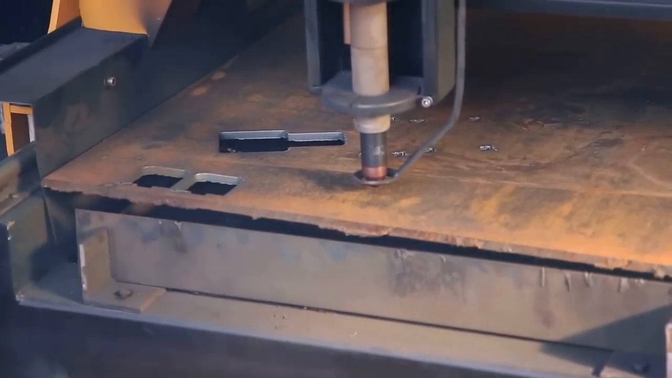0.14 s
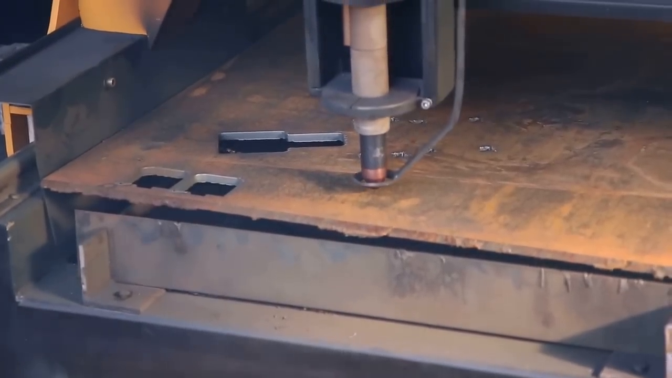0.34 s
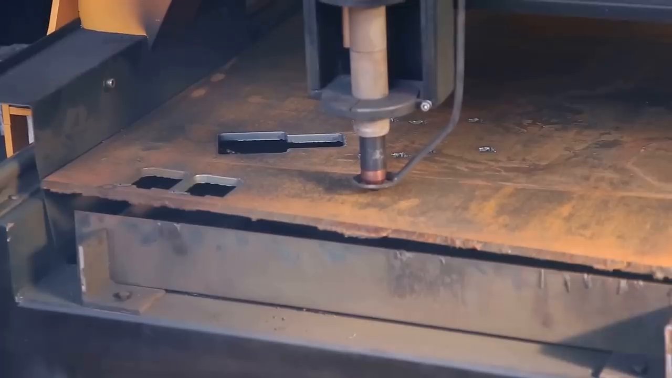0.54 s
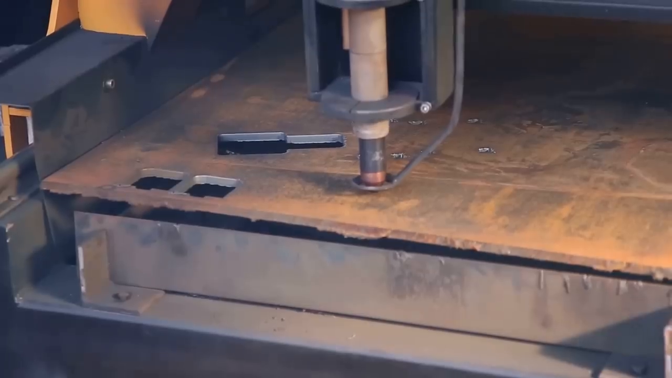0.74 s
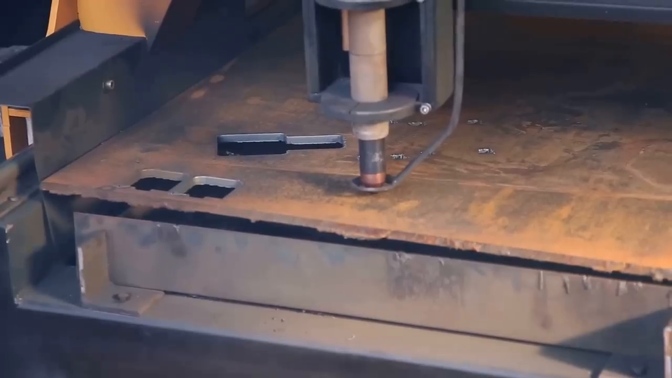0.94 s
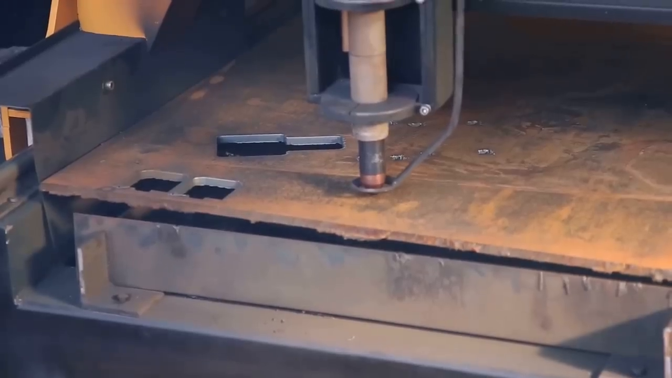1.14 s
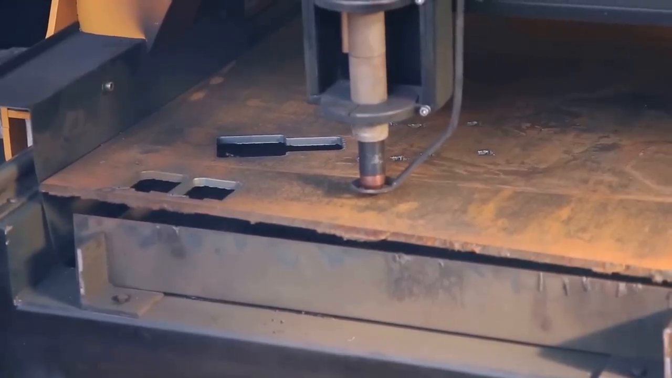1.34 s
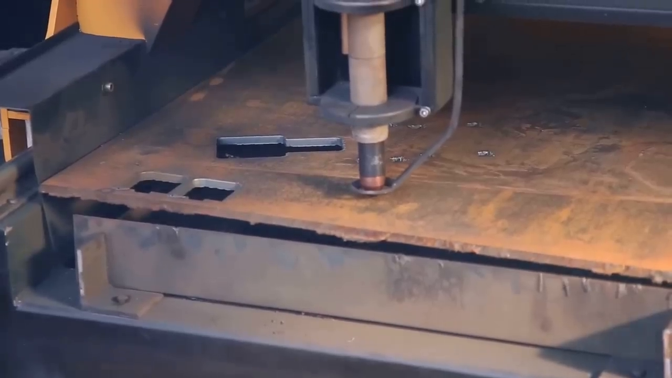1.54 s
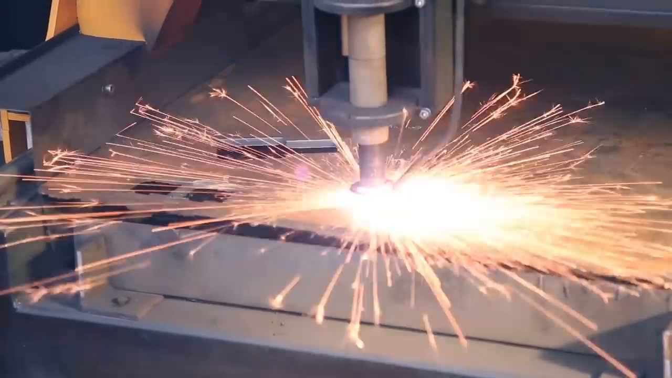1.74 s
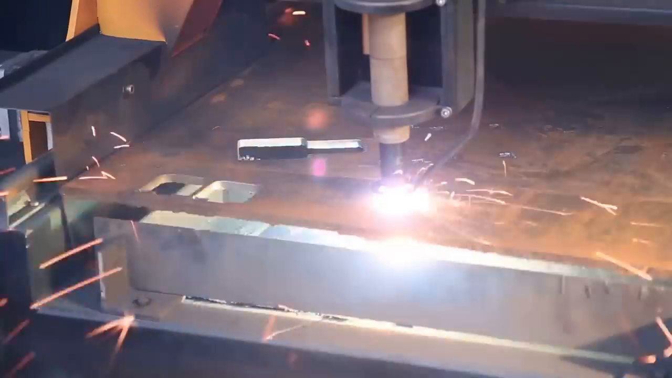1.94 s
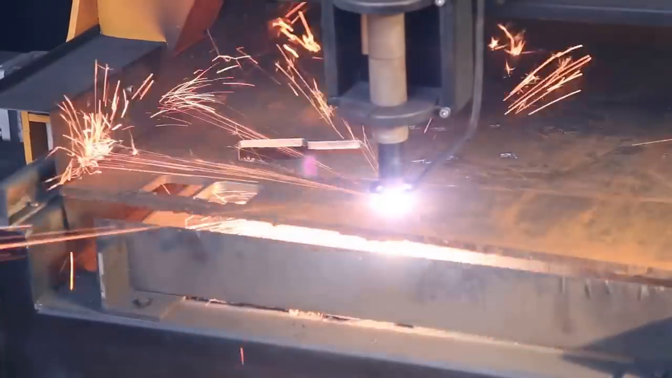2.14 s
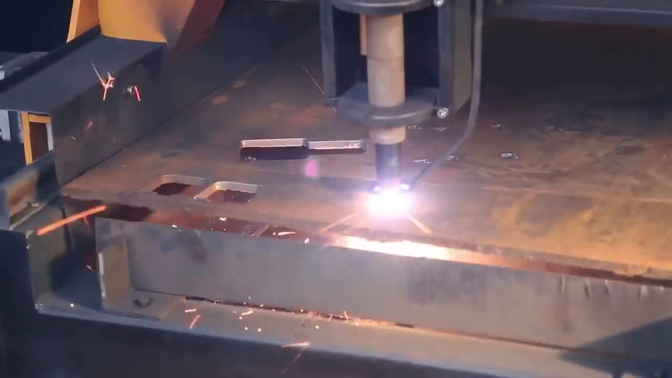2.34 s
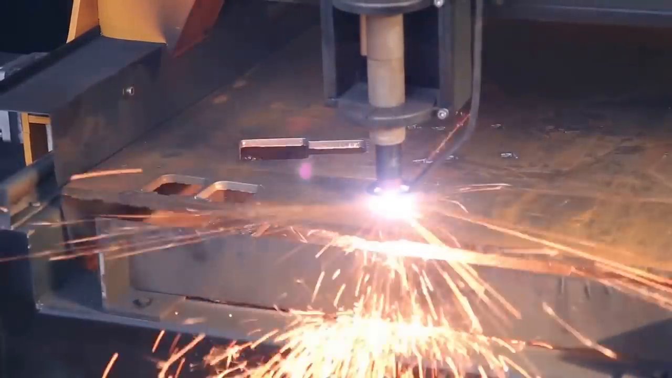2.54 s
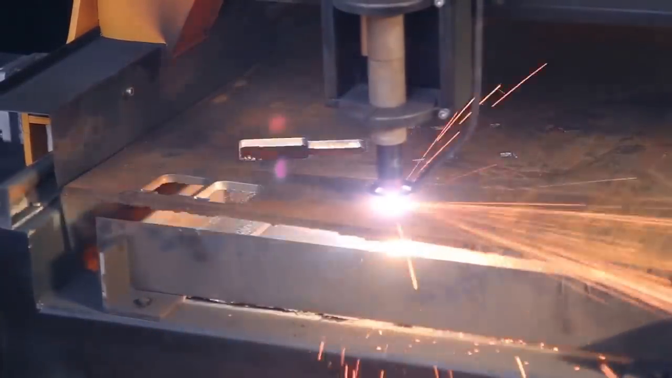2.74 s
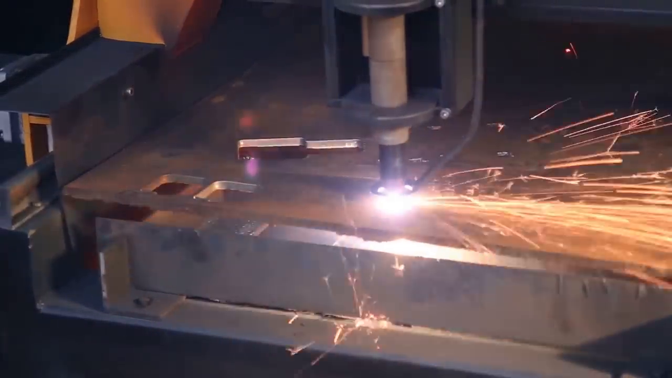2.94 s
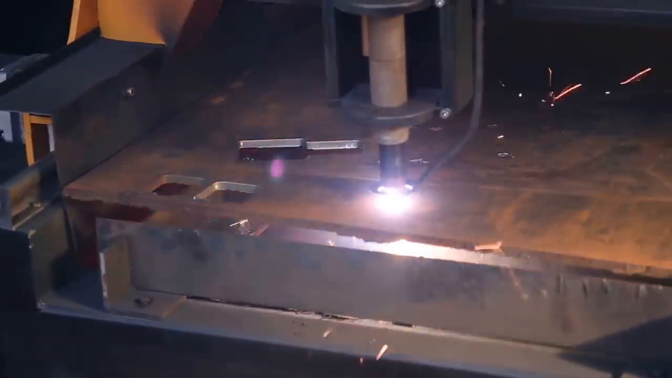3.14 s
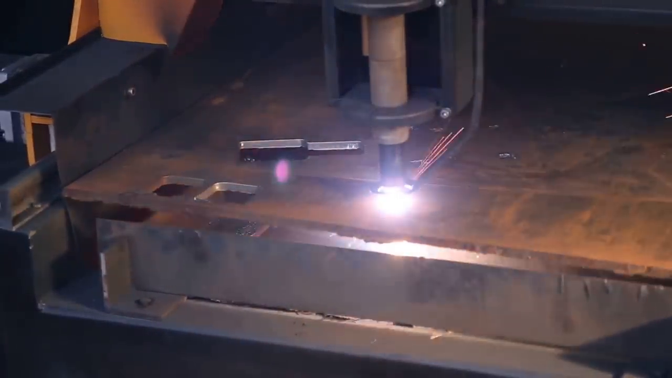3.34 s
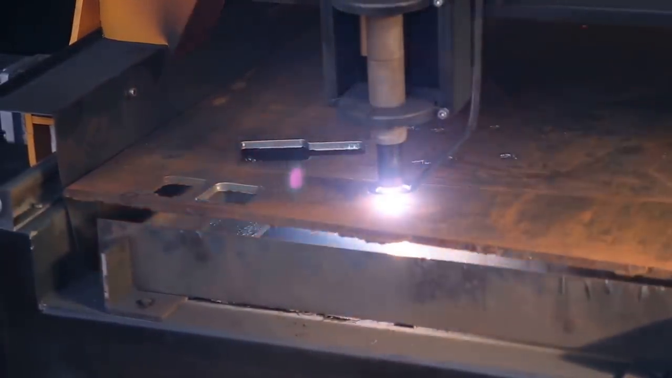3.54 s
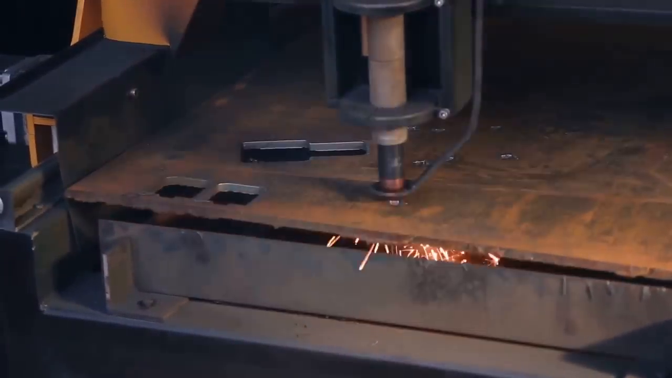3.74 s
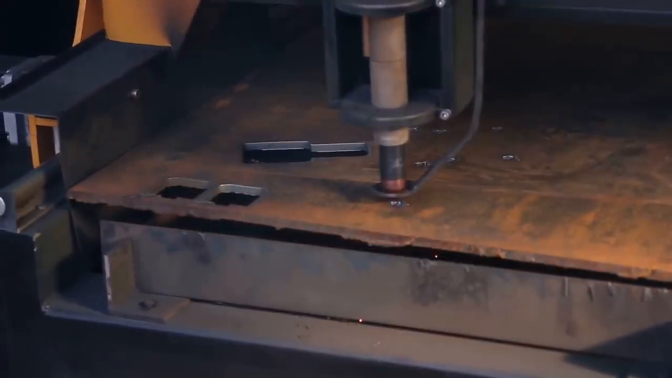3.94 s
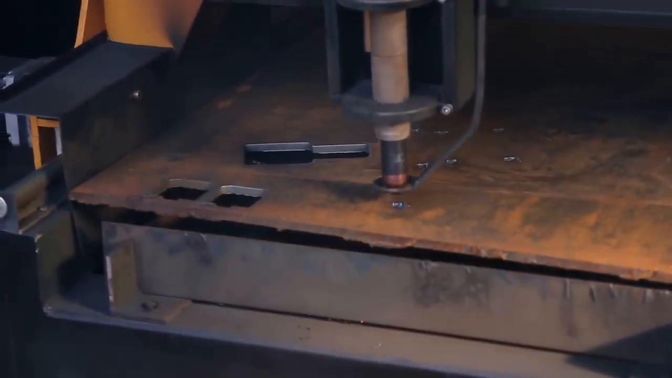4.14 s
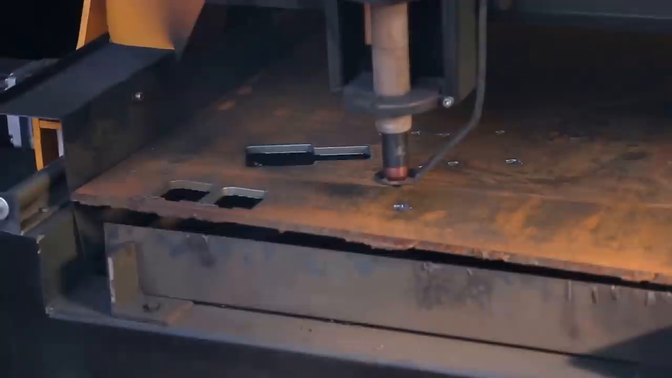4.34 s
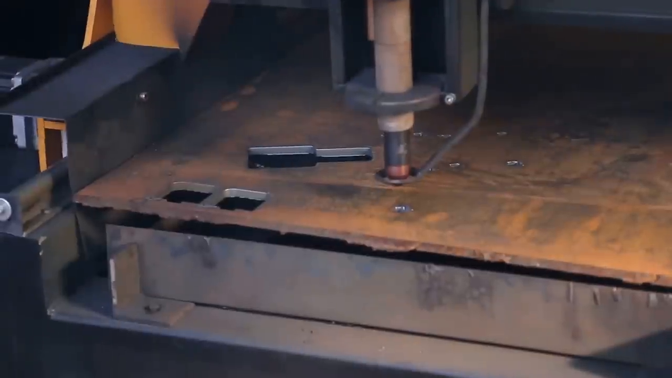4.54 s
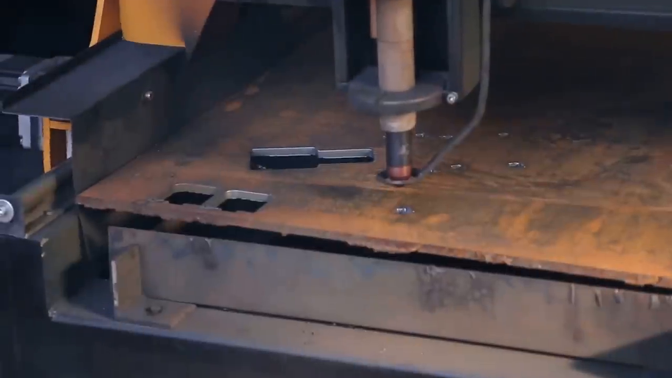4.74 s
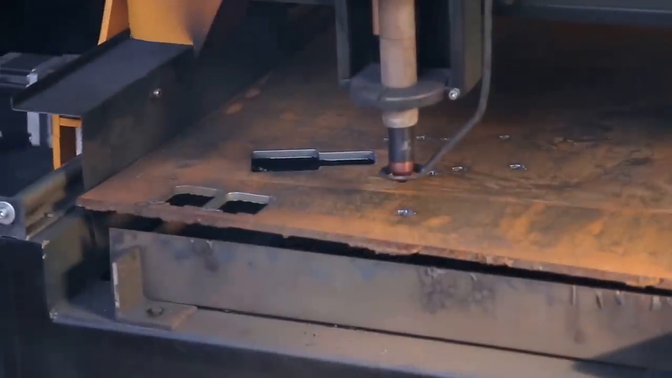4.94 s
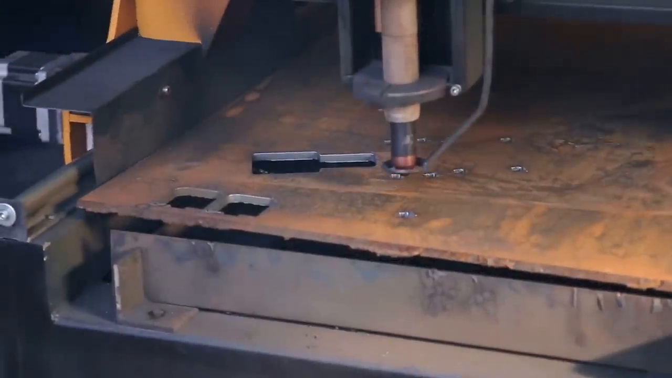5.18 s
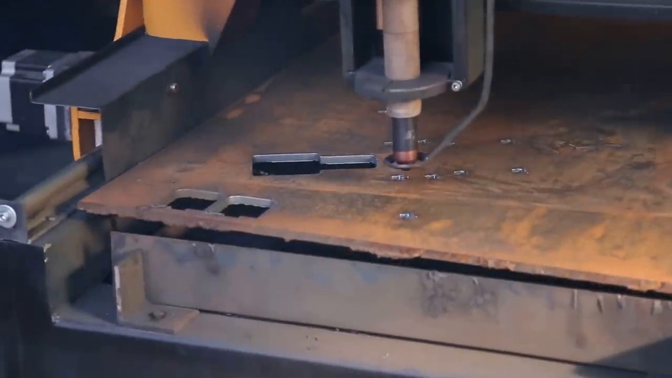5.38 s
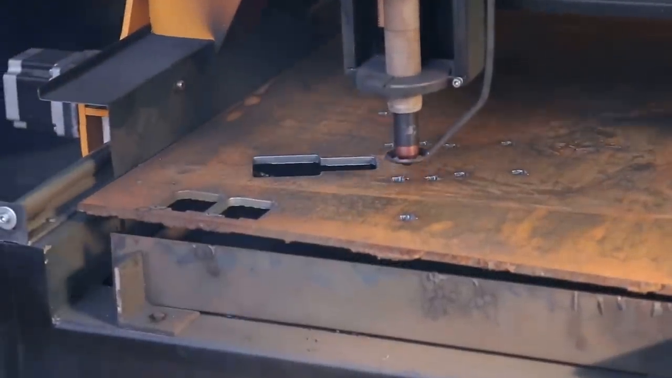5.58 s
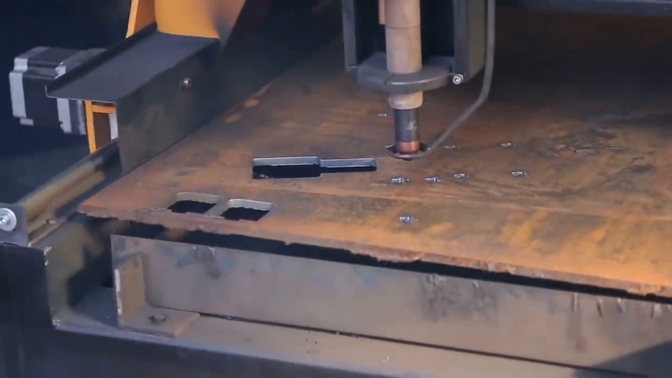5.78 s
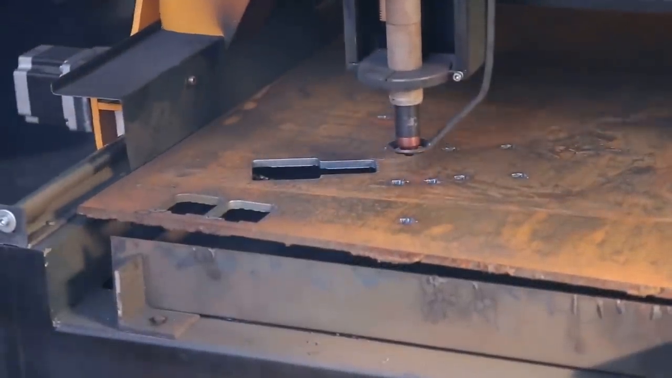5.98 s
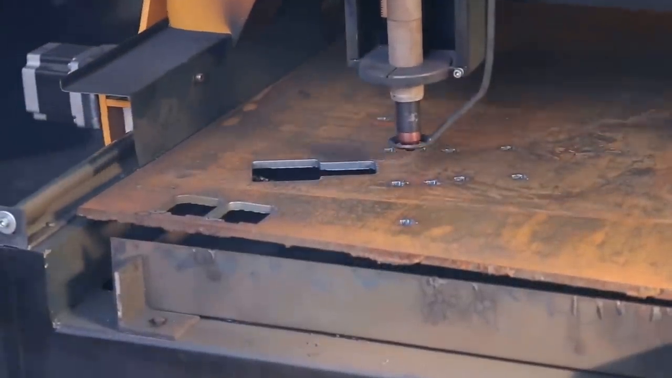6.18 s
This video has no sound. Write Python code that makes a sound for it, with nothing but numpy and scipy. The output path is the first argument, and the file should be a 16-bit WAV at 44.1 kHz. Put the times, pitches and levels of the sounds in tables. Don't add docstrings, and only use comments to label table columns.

```python
import sys
import numpy as np
from scipy import signal
from scipy.fft import rfft, irfft
from scipy.io import wavfile
from scipy.ndimage import uniform_filter1d

SR = 44100
rng = np.random.default_rng(int(sys.argv[2]) if len(sys.argv) > 2 else 0)


def master(y):
    cut = np.clip(np.atleast_2d(y).T, -1, 1)
    pcm = np.round(cut * 32767)
    wavfile.write(sys.argv[1], SR, pcm.astype(np.int16))


def linear_from_db(decibels):
    return 10 ** (np.asarray(decibels, float) / 20)


N = 273861
SECONDS = np.arange(N) / SR
FULL_FLOW_DB = -20

# frequency in Hz, level in dB per Hz.
ARC_COLOUR = [(600, -14), (880, -11.5), (1000, -3.5), (1400, -6.5), (2200, -3.5), (4300, -0.65),
              (5300, -7.5), (8200, -6), (9500, -3), (11300, -6), (12800, -5.5), (13600, -4.5), (14200, -11),
              (14800, -14), (15300, -13), (15700, -12.5)]
# multiple of the loudest line, level in dB.
CARRIAGE_DRIVE_LINES = [(.25, -5.5), (.5, 1)]


def curve(table):
    s, *columns = np.transpose(table)
    inside = 1. * ((SECONDS >= s[0]) & (SECONDS <= s[-1]))
    return uniform_filter1d(inside, size=45), [np.interp(SECONDS, s, c) for c in columns]


def noise(colour, rings=()):
    hz = np.fft.rfftfreq(N, 1 / SR) + 1e-3
    colour_hz, colour_db = np.transpose(colour)
    db = np.interp(np.log(hz), np.log(colour_hz), colour_db)
    for centre_hz, width_hz, ring_db in rings:
        db = db + ring_db / (1 + (2 * (hz - centre_hz) / width_hz) ** 2)
    return rfft(rng.standard_normal(N)) * linear_from_db(db), hz


def rms(spectrum, hz, band):
    inside = (hz > band[0]) & (hz < band[1])
    return np.sqrt(2 * np.sum(np.abs(spectrum[inside]) ** 2)) / N


def parts(spectrum, hz, bands, edges):
    below = [0] + [1 / (1 + (hz / edge) ** 12) for edge in edges] + [1]
    return [irfft(spectrum * (upper - lower), N) / rms(spectrum, hz, band)
            for lower, upper, band in zip(below, below[1:], bands)]


def patchy(x, patch_db, patch_s, patch_hz, size):
    z = signal.stft(x, nperseg=size)[2]
    field = rng.standard_normal(z.shape)
    for _ in range(2):
        field = uniform_filter1d(field, size=max(int(2 * patch_s * SR / size), 1), axis=1)
        field = uniform_filter1d(field, size=max(int(patch_hz * size / SR), 1), axis=0)
    gain = linear_from_db(patch_db * field / field.std())
    return signal.istft(z * gain / np.sqrt(np.mean(gain ** 2)), nperseg=size)[1][:N]


def jet(table, colour, rings, streak_db, flutter_db, roar_db, roar_lag, top_db, top_lag, sputter_db=0):
    inside, (hiss_db, *length) = curve(table)
    hiss_db = hiss_db + sputter_db
    weak_db = FULL_FLOW_DB - hiss_db
    bands = [(90, 400), (1300, 4500), (5500, 12500), (13000, 15500)]
    _, roar, hiss, top = parts(*noise(colour, rings), bands, edges=[520, 5000, 12900])
    long_arc_db = 9 * sum(length)
    flow = linear_from_db(roar_db + roar_lag * weak_db) * roar + hiss
    flow += linear_from_db(top_db + top_lag * weak_db + long_arc_db) * top
    flow = patchy(flow, streak_db, patch_s=.25, patch_hz=130, size=1024)
    return inside * linear_from_db(hiss_db) * patchy(flow, flutter_db, patch_s=.015, patch_hz=6200, size=256)


def air():
    # time in seconds, hiss level in dB.
    air_flow = [
        (0.0, -20.5),
        (0.82, -20.5),
        (1.1, -19.5),
        (1.4, -20.5),
        (1.47, -26.5),
        (1.55, -33.5),
        (1.62, -45.5),
        (1.7, -56),
        (1.78, -67),
    ]
    # frequency in Hz, level in dB per Hz.
    air_colour = [(600, -26), (880, -16), (1000, -12), (1600, -8.5), (2200, -10), (3300, -6.5), (5300, -3),
                  (6100, 4), (8200, 5), (11300, 4.5), (12800, 6), (13600, 2), (14800, -4), (15700, -2)]
    # frequency in Hz, width in Hz, level in dB.
    air_rings = [(1360, 660, 2.5), (1607, 93, -10), (2250, 200, 4.5), (2635, 110, 5), (3830, 130, 4),
                 (6400, 94, 2.5), (6700, 50, -1), (7950, 95, 0), (9800, 1800, 3)]
    return jet(air_flow, air_colour, air_rings, streak_db=1.05, flutter_db=0.5,
               roar_db=-8.0, roar_lag=0.41, top_db=-9.0, top_lag=-0.16)


def pilot():
    # time in seconds, hiss level in dB.
    pilot_flow = [
        (1.783, -44),
        (1.788, -32),
        (1.8, -37),
        (1.815, -30.5),
        (1.826, -27),
    ]
    # frequency in Hz, width in Hz, level in dB.
    pilot_rings = [(1700, 600, -8), (3000, 1200, 2), (4300, 700, -5), (5300, 1200, -6), (7500, 2500, -3),
                   (12000, 2500, 4)]
    return jet(pilot_flow, ARC_COLOUR, pilot_rings, streak_db=2.0, flutter_db=4.0,
               roar_db=-4.0, roar_lag=.1, top_db=-7, top_lag=.05)


def sputter():
    # time in seconds, level change in dB, length in seconds.
    sputters = [
        (1.935, 1, 0.045),
        (2.313, 2, 0.053),
        (2.39, -2.5, .06),
        (2.46, 2, 0.13),
        (3.134, 3, 0.078),
        (3.25, -2.5, 0.052),
        (3.303, 2, 0.042),
        (2.8, 0.5, 0.11),
        (3.6, -3, 0.058),
    ]
    at_s, db, length_s = np.transpose(sputters)
    return db @ np.exp(-(2 * (SECONDS - at_s[:, None]) / length_s[:, None]) ** 2)


def arc():
    # time in seconds, hiss level in dB, arc length over the plate 0-1.
    arc_flow = [
        (1.827, -15, 0),
        (1.85, -19, 0.7),
        (2.0, -19, 0.8),
        (2.2, -20.5, .6),
        (2.65, -20, 0.22),
        (2.85, -19, 0.5),
        (3.14, -20.5, 0.55),
        (3.55, -20.5, 0.8),
        (3.804, -21, 1),
    ]
    # frequency in Hz, width in Hz, level in dB.
    arc_rings = [(1060, 200, 1.2), (2020, 90, 3), (2890, 140, 2), (6960, 60, 4), (7400, 120, 3),
                 (9800, 150, 2), (11600, 150, 2)]
    return jet(arc_flow, ARC_COLOUR, arc_rings, streak_db=1.3, flutter_db=0.6,
               roar_db=-6.5, roar_lag=0.54, top_db=-15, top_lag=.1, sputter_db=sputter())


def cooling():
    # time in seconds, hiss level in dB.
    cooling_flow = [
        (3.802, -23),
        (3.85, -30),
        (3.95, -31.5),
        (4.45, -21),
        (4.9, -22),
        (4.98, -24),
        (5.1, -24.5),
        (5.4, -20),
        (6.21, -19.5),
    ]
    # frequency in Hz, level in dB per Hz.
    cooling_colour = [(600, -11), (880, -9), (1000, -1.5), (1600, -4.5), (2200, -1.5), (4300, -1.5),
                      (5300, -6), (6100, -6), (8200, -5), (11300, -4), (12800, -4.5), (13600, -7),
                      (14800, -13), (15700, -13)]
    # frequency in Hz, width in Hz, level in dB.
    cooling_rings = [(3650, 72, 1.7), (6230, 150, 5.1), (9000, 200, 3.3), (10370, 230, 2.9),
                     (12800, 300, 2)]
    return jet(cooling_flow, cooling_colour, cooling_rings, streak_db=0.2, flutter_db=0.74,
               roar_db=-7, roar_lag=0.12, top_db=-13.0, top_lag=.05)


def whistle(x):
    # start in seconds, end in seconds, frequency in Hz, width in Hz, level in dB; negative is a dip.
    passing_bands = [(1.9, 1.94, 3880, 220, 11), (2.04, 2.42, 4350, 190, 5), (2.5, 2.75, 3750, 170, 6.5),
                     (3.15, 3.65, 4310, 200, 5), (1.95, 2.58, 12900, 500, 5.5), (2.11, 2.4, 9060, 250, 7.5),
                     (3.45, 3.45, 9020, 200, 3), (3.3, 3.8, 8900, 250, 3.5), (3.05, 3.6, 10100, 300, 4),
                     (3.47, 3.6, 11400, 3200, -3), (1.875, 1.95, 2800, 500, 2.5), (1.83, 1.95, 6000, 700, 4),
                     (3.46, 3.58, 1080, 300, -4.5), (2.68, 2.85, 1080, 280, 1), (2.58, 2.7, 2200, 600, -4),
                     (5.05, 5.7, 1700, 280, -3), (0.34, 1.16, 1500, 690, 3), (5.05, 5.3, 450, 400, -2),
                     (5.46, 5.6, 750, 500, -8), (3.62, 3.78, 11000, 2700, 2.5), (3.25, 3.8, 8900, 200, 0),
                     (1.93, 1.96, 1900, 1500, -6), (2.75, 2.95, 4300, 600, -1.5), (3.1, 3.4, 1100, 300, -1.5),
                     (2.1, 2.4, 1060, 250, -1), (4.76, 4.96, 1270, 370, 3), (3.97, 4.3, 640, 750, -6),
                     (1.78, 1.87, 470, 350, -8), (1.93, 2.18, 10750, 440, 5.5), (2.4, 3.8, 10900, 250, 5.5),
                     (1.81, 1.98, 2670, 580, 5.5), (5.88, 6.21, 1085, 360, 5.5), (2.5, 2.9, 8300, 270, -5),
                     (3.55, 3.9, 2360, 880, 4), (5.85, 6.3, 2100, 1300, 2.5), (3.15, 3.65, 5500, 1000, -2),
                     (2.55, 2.9, 5900, 1200, 2.5), (5.3, 5.62, 1580, 2000, -2.5), (5.05, 6.3, 15000, 790, 4),
                     (2.3, 2.5, 15700, 1500, 3), (5.35, 5.75, 11500, 4600, 1)]
    hz, s, z = signal.stft(x, SR, nperseg=512)
    start, end, centre_hz, width_hz, db = np.transpose(passing_bands)[:, :, None]
    edge_s = 0.067
    on = np.clip(np.minimum(s - start, end - s) / edge_s + .5, 0, 1)
    shape_db = db / (1 + (2 * (hz - centre_hz) / width_hz) ** 2)
    return signal.istft(z * linear_from_db(shape_db.T @ on), nperseg=512)[1][:N]


def pops():
    # time in seconds, peak in dB, t60 in seconds, noisy share 0-1.
    sparks = [
        (1.7819, -15, .006, .9),
        (1.7873, -17, .003, 0.8),
        (1.7858, -28, .003, 0.9),
        (1.8261, -12, .003, .9),
        (1.8272, 1, 0.02, 0.7),
        (1.8302, -1, 0.012, 0.8),
    ]
    # time in seconds, peak in dB, ring in Hz, t60 in seconds, rise in seconds.
    knocks = [(1.7819, -25, 4500, .002, .0001), (1.7874, -9, 3400, .0028, .00008),
              (1.8259, -14, 2500, .0015, .00004), (1.8277, -3, 5500, .002, .00004),
              (4.403, -12, 3000, .002, .00004), (2.2955, -9, 1080, .022, .003),
              (3.8026, -13, 1520, .014, .0005), (3.8026, -5, 1060, .017, .002),
              (3.8028, -14, 560, .014, .001), (3.812, -17, 800, .02, .002),
              (1.7874, -22, 1500, .003, .0001), (3.826, -26, 190, .12, .012), (3.828, -25, 710, .05, .008),
              (3.846, -24, 930, .035, .006), (3.855, -26, 500, .04, .006)]
    spark_hz, spark_rise_s, knock_noisy = 10360, .0002, 0.1
    events = [(s, db, spark_hz, t60, spark_rise_s, noisy) for s, db, t60, noisy in sparks]
    events += [(*knock, knock_noisy) for knock in knocks]
    out, t = np.zeros(N), np.arange(4096) / SR
    for s, db, hz, t60, rise, noisy in events:
        crackle = 0.38 * np.diff(rng.standard_normal(len(t) + 1))
        wave = -(1 - noisy) * np.sin(2 * np.pi * hz * t) + noisy * crackle
        at = int(s * SR)
        out[at:at + len(t)] += linear_from_db(db - 60 * t / t60) * np.minimum(t / rise, 1) * wave
    return out


def carriage():
    # time in seconds, scrape level in dB.
    rolling = [
        (4.15, -47),
        (4.3, -32.5),
        (4.45, -25.5),
        (4.6, -24),
        (4.75, -24),
        (4.92, -24),
        (4.962, -26.5),
        (4.972, -38),
        (4.99, -55),
    ]
    # frequency in Hz, level in dB per Hz.
    scrape_colour = [(400, -51), (700, -3), (1100, -1.5), (2200, 5), (3200, 2.5), (4500, 1.5), (7000, -33),
                     (12000, -45)]
    # frequency in Hz, width in Hz, level in dB.
    frame_rings = [(965, 30, 9), (1250, 36, 10), (1500, 18, 9), (1678, 14, 10), (1706, 10, 6),
                   (1820, 20, 9), (1926, 20, 7), (2008, 25, 6), (2235, 70, 6), (2411, 30, 5),
                   (2640, 100, 5), (2895, 56, 7), (3091, 23, 6), (3660, 18, 6)]
    inside, (db,) = curve(rolling)
    scrape, = parts(*noise(scrape_colour, frame_rings), bands=[(1100, 2960)], edges=[])
    return inside * linear_from_db(db) * patchy(scrape, patch_db=1.0, patch_s=.012, patch_hz=1500, size=256)


def hall(x):
    t60_s, tail_db = 0.51, -9.5
    t = np.arange(SR // 2) / SR
    tail = uniform_filter1d(rng.standard_normal(len(t)), size=3) * linear_from_db(-60 * t / t60_s) * (t > .004)
    return x + linear_from_db(tail_db) * signal.fftconvolve(x, tail / np.sqrt(np.sum(tail ** 2)))[:N]


def motor(table, lines, wobble, others_db):
    inside, (hz, db, *load) = curve(table)
    uneven = uniform_filter1d(rng.standard_normal(N), size=2000)
    step = 2 * np.pi * (1 + wobble * uneven / uneven.std()) / SR
    drive = hz[0] * np.cumsum(step)
    others = np.zeros(N)
    for multiple, line_db, *beat in lines:
        swing_db, loudest_s, period_s = beat or (0, 0, 1)
        beat_db = swing_db * np.cos(2 * np.pi * (SECONDS - loudest_s) / period_s)
        others += linear_from_db(line_db + beat_db) * np.sin(multiple * drive + 2 * np.pi * rng.random())
    load_db = 24 * sum(load)
    hum = np.sin(np.cumsum(hz * step))
    return inside * linear_from_db(db) * np.sqrt(2) * (hum + linear_from_db(others_db + load_db) * others)


def first_motor():
    # time in seconds, pitch of the loudest line in Hz, level in dB, load 0-1.
    first_hum = [
        (0, 161.9, -32.5, 0.14),
        (.5, 161.5, -30.5, 0.21),
        (.9, 162.2, -29, 0.18),
        (1.02, 161, -35.5, 0.32),
        (1.08, 153.7, -43, 0.5),
        (1.2, 154.6, -41, 0.25),
        (1.36, 160, -48, 0),
    ]
    # swing in dB, loudest in s, period in s.
    first_lines = [(.5, -8, 2, 1, 1), (1.5, 0, 1.5, .25, 1.7), (2, -1, 1.5, 0.54, 0.78), (2.5, -13),
                   (3, -11.5, 5, 1.7, 1.2), (4, -21), (5, -15), (6, -0.5, 0.5, 0.5, 1.5),
                   (7, -2, 2, .5, .5)]
    return motor(first_hum, first_lines, wobble=0.0016, others_db=-17)


def lift_motor():
    # time in seconds, pitch in Hz, level in dB, load 0-1.
    lift_hum = [(1.36, 160.2, -46, 0.92), (1.43, 163, -39, 0.97), (1.5, 156.7, -43, 1),
                (1.6, 161, -38.5, 1), (1.67, 163, -34.5, 0.94), (1.73, 161.7, -42, 1),
                (1.77, 158, -34.5, 0.98), (1.84, 157, -55, .5), (1.97, 174.6, -57, 0),
                (2.02, 182.5, -37, 0), (2.12, 175, -64, 0)]
    # multiple, level in dB; a near neighbour makes the hum beat.
    lift_lines = [(.9, -6), (2, -16)]
    return motor(lift_hum, lift_lines, wobble=.004, others_db=-22.5)


def transformer_buzz():
    # time in seconds, pitch in Hz, level in dB.
    buzz = [
        (1.42, 105.3, -60),
        (1.46, 105, -50),
        (1.6, 101, -52),
        (1.7, 98, -45),
        (1.79, 101, -41),
        (1.83, 102, -62),
    ]
    # multiple, level in dB.
    buzz_lines = [(3, -9), (3.6, -12)]
    return motor(buzz, buzz_lines, wobble=0.0204, others_db=-4)


def drive_start():
    # time in seconds, pitch in Hz, level in dB.
    groan = [(4.06, 350, -56), (4.085, 343, -40), (4.105, 290, -44), (4.125, 185, -42), (4.15, 170, -42),
             (4.18, 172, -55), (4.24, 180, -43), (4.262, 180, -52), (4.29, 180, -40), (4.32, 172, -50),
             (4.345, 173, -43), (4.375, 170, -40), (4.41, 170, -60)]
    return motor(groan, CARRIAGE_DRIVE_LINES, wobble=.03, others_db=-30)


def second_motor():
    # time in seconds, pitch of the loudest line in Hz, level in dB, load 0-1.
    second_hum = [
        (4.95, 376, -50, 0),
        (5.14, 377, -37, 0),
        (5.3, 377.5, -35, 0.97),
        (5.46, 377.4, -33.5, 0.59),
        (5.85, 378, -34, .7),
        (5.93, 377, -41.5, 0.97),
        (6.02, 377, -36.5, 0.85),
        (6.12, 381, -30.5, 0),
        (6.21, 382, -31.5, 0.44),
    ]
    return motor(second_hum, CARRIAGE_DRIVE_LINES, wobble=0.0018, others_db=-26.0)


def thuds():
    # time in seconds, boom in dB, upper rumble in dB, fading time in seconds; negative is a lull.
    table_thuds = [(.9, 15, 3.5, 0.15), (1.12, 5, -1, .15), (1.43, 8, -2.5, .2), (1.7, 0, 7, 0.096),
                   (1.84, -2, -4, 0.086), (1.94, -4, -6, .05), (2.0, 3, 8, 0.055), (2.2, 2, -4, .1),
                   (3.12, -10, -3, .15), (3.45, -4, 1, 0.18), (3.802, 2, 14, 0.085), (3.822, 9, 4, .13),
                   (3.85, 4, 3, .07), (3.88, 0, 4, .06), (4.12, 3, -4, .3), (4.36, 0, -2, 0.11),
                   (4.63, 8, 0, 0.057), (4.8, -3, 0.5, 0.3), (5.08, -4, 0, .12), (5.27, 2, 0.5, .08),
                   (5.6, 5, 3.5, 0.14), (5.7, -3, 6, 0.11)]
    at_s, boom_db, upper_db, fade_s = np.transpose(table_thuds)
    rise_s = 0.0019
    t = SECONDS - at_s[:, None]
    shape = np.clip(t / rise_s, 0, 1) * np.exp(-np.maximum(t, 0) / fade_s[:, None])
    return [db @ shape for db in (boom_db, (boom_db + upper_db) * 0.4, upper_db)]


def shop(torch):
    # time in seconds, gain in dB.
    camera_gain = [(0, -2.5), (.85, -2), (1.38, -7), (1.48, 1.5), (1.82, 1.5), (1.85, -5), (1.95, -6.5),
                   (2.15, -6), (2.45, -2.5), (2.65, -3), (3.1, -3.5), (3.3, -2.5), (3.55, -6), (3.78, -1.5),
                   (3.92, -1), (3.96, -4), (4.05, -9), (4.08, 0), (4.3, 2), (4.6, 3), (5.2, 7.5),
                   (5.35, 10.5), (6.21, 8.5)]
    # frequency in Hz, level in dB per Hz.
    shop_colour = [(12, -64), (25, -13), (55, -12), (90, -8), (171, -2.5), (211, -6), (288, -5.5),
                   (434, -7.5), (511, -7), (564, -7), (733, -5), (822, -7), (1000, -10), (1300, -10.5),
                   (2800, -12), (4500, -40), (7000, -90)]
    levels_db, follows, blown = (-51.5, -52, -49), (0.53, 0.92, 0.34), (.01, 0.21, 0.36)
    _, (gain_db,) = curve(camera_gain)
    flow_db = 10 * np.log10(uniform_filter1d(torch ** 2, size=4000) + 1e-9) - FULL_FLOW_DB
    bands = [(88, 140), (190, 230), (520, 900)]
    layers = parts(*noise(shop_colour), bands, edges=[150, 480])
    boom, drone, upper = [
        linear_from_db(db + gain_share * gain_db + flow_share * flow_db + thud_db) * layer
        for db, gain_share, flow_share, thud_db, layer in zip(levels_db, follows, blown, thuds(), layers)]
    supply_on_s, boom_before_db = 0.83, -7
    on = np.clip((SECONDS - supply_on_s) / 0.049, 0, 1)
    rumble = linear_from_db(boom_before_db * (1 - on)) * boom + drone + upper
    rumble = patchy(rumble, patch_db=2.0, patch_s=.12, patch_hz=149.7, size=2048)
    supply_hz, supply_width_hz, supply_db = 101, 13, -54.5
    spectrum, hz = noise([(20, 0), (20000, 0)])
    spectrum = spectrum / (1 + (2 * (hz - supply_hz) / supply_width_hz) ** 2)
    hum, = parts(spectrum, hz, bands=[(60, 140)], edges=[])
    return rumble + on * linear_from_db(supply_db + 0.5 * gain_db) * hum


def scene():
    torch = air() + pilot() + arc() + cooling()
    near = hall(linear_from_db(-0.93) * (whistle(torch + carriage())) + pops())
    motors = first_motor() + lift_motor() + transformer_buzz() + drive_start() + second_motor()
    mono = near + motors + shop(torch)
    return np.array([mono, mono])


def splits():
    # time in seconds, low edge in Hz, high edge in Hz, level in dB.
    side_bursts = [(0.009, 7540, 9000, -35), (0.01, 11800, 13200, -36), (0.471, 5690, 7580, -31.7),
                   (0.958, 10260, 11690, -31.7), (1.376, 14510, 15720, -41), (1.887, 6250, 8900, -25.1),
                   (2.211, 9650, 11760, -28.6), (2.513, 14470, 15850, -38), (2.861, 6250, 8270, -29.2),
                   (3.35, 6800, 9690, -28), (3.511, 4200, 5270, -33.9), (3.522, 6890, 10800, -26),
                   (3.745, 12450, 13780, -30.8), (4.417, 5690, 6890, -33.7), (4.417, 13780, 15760, -39),
                   (4.74, 4070, 6250, -31.4), (5.879, 4260, 5170, -34.5), (5.97, 4220, 5150, -32.3)]
    out, size = np.zeros(N + 4096), 2048
    hz = np.fft.rfftfreq(size, 1 / SR)
    window = signal.windows.kaiser_bessel_derived(size, 4 * np.pi)
    for s, low_hz, high_hz, db in side_bursts:
        burst = irfft(rfft(rng.standard_normal(size)) * (hz > low_hz) * (hz < high_hz), size)
        at = int(s * SR) + size // 2
        out[at:at + size] += linear_from_db(db) * burst / burst.std() * window
    return out[size:size + N] * np.array([[1], [-1]])


def low_pass(x):
    return signal.sosfilt(signal.butter(12, 16780, fs=SR, output="sos"), x)


def record(dry):
    low_hz, top_hz = 48, 15735
    hz = np.fft.rfftfreq(N, 1 / SR)
    passband = hz ** 2 / (hz ** 2 + low_hz ** 2) / (1 + (hz / top_hz) ** 600)
    mix = irfft(rfft(dry + splits()) * passband, N)
    return low_pass(mix)


dry = scene()
out = record(dry)
master(out)
```